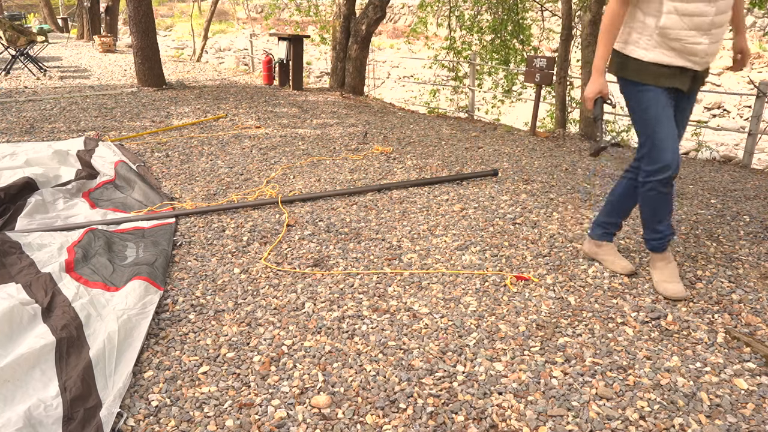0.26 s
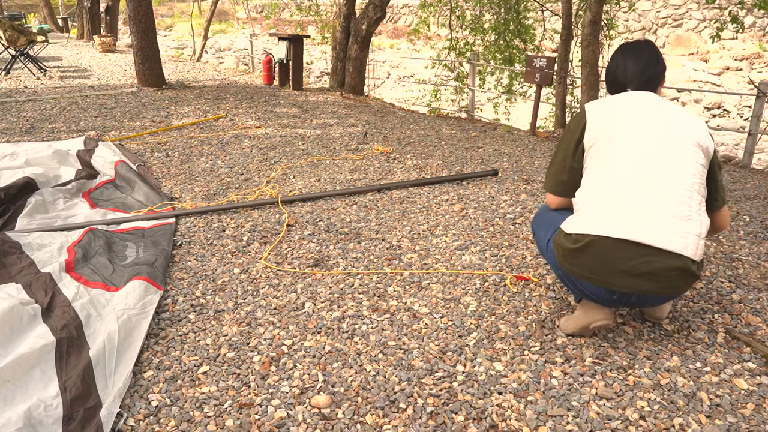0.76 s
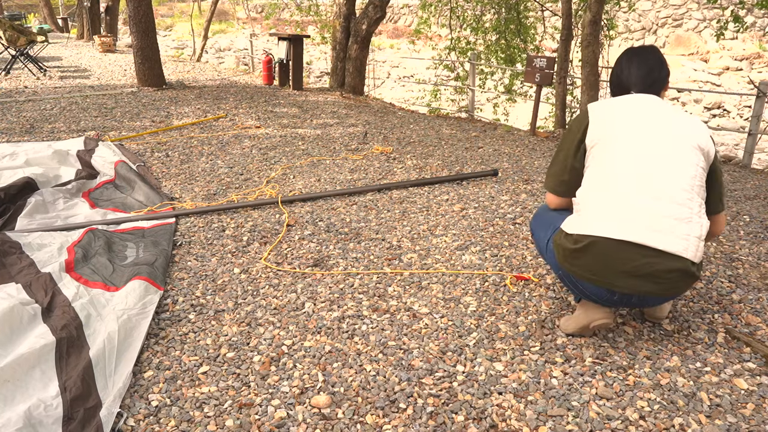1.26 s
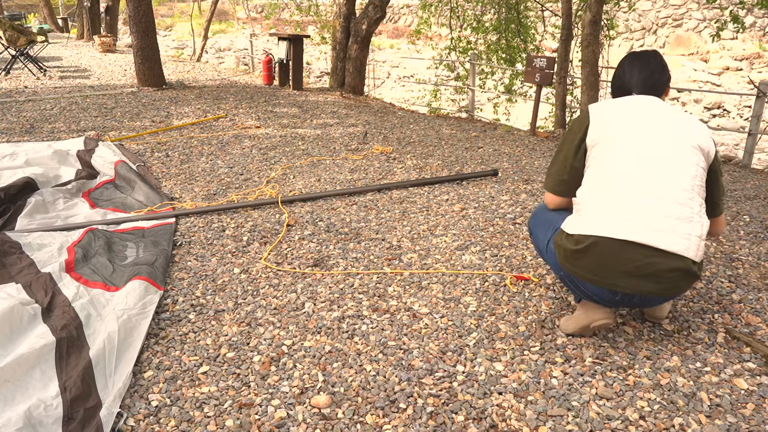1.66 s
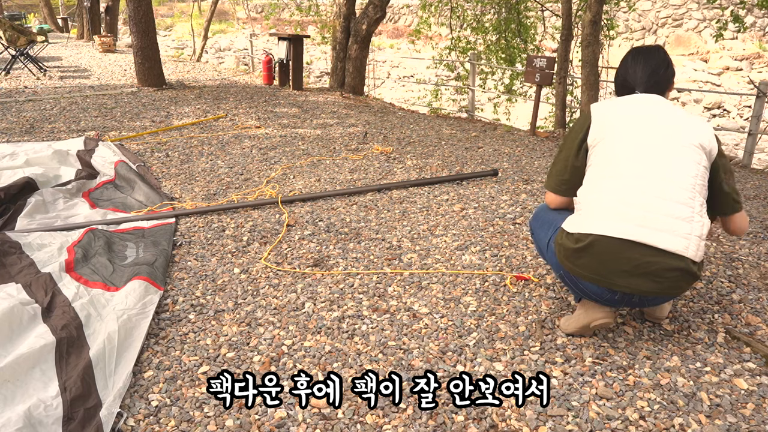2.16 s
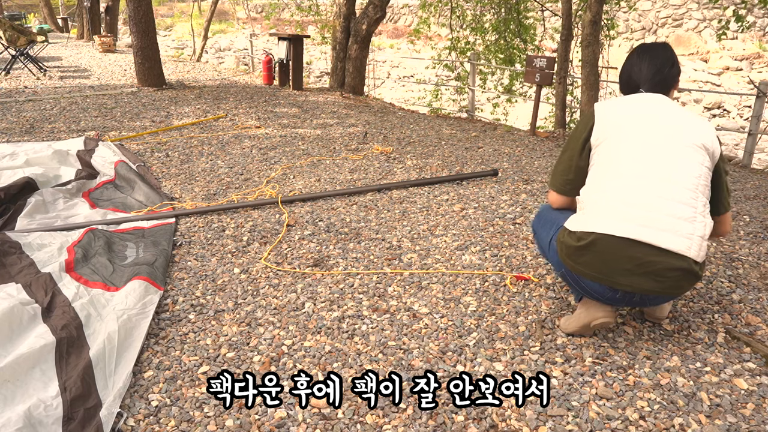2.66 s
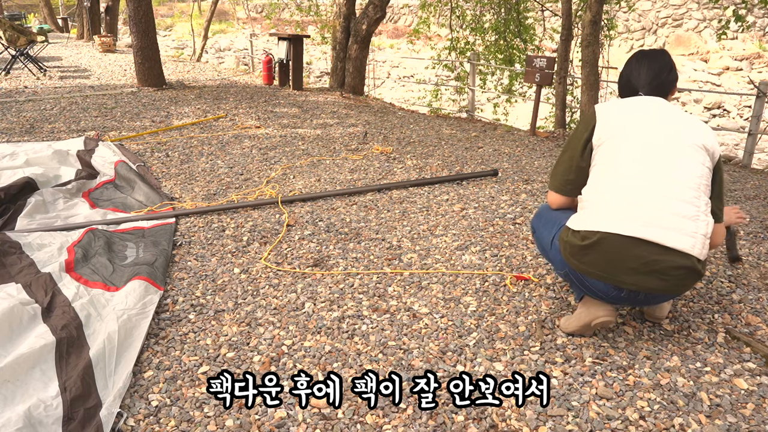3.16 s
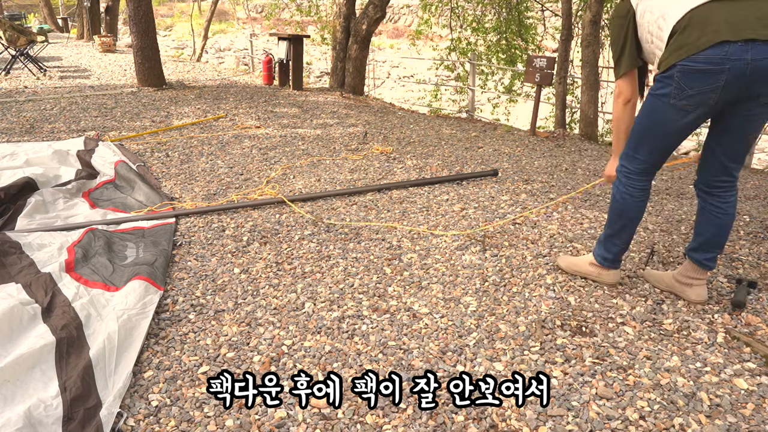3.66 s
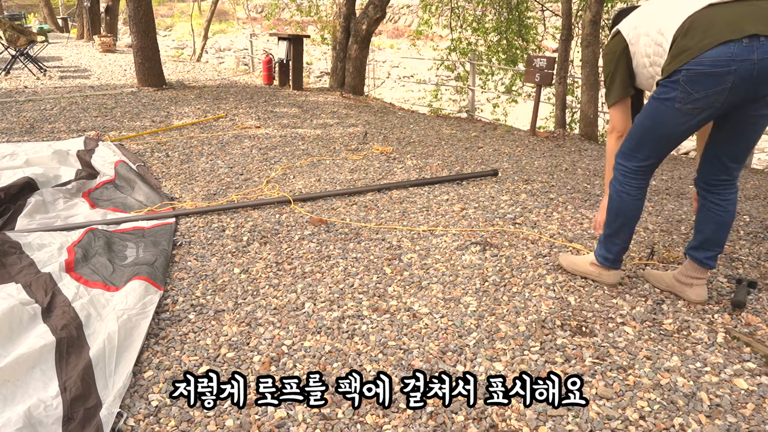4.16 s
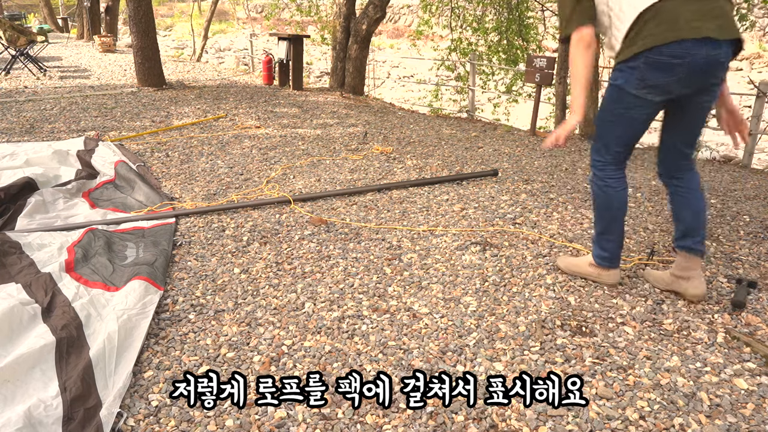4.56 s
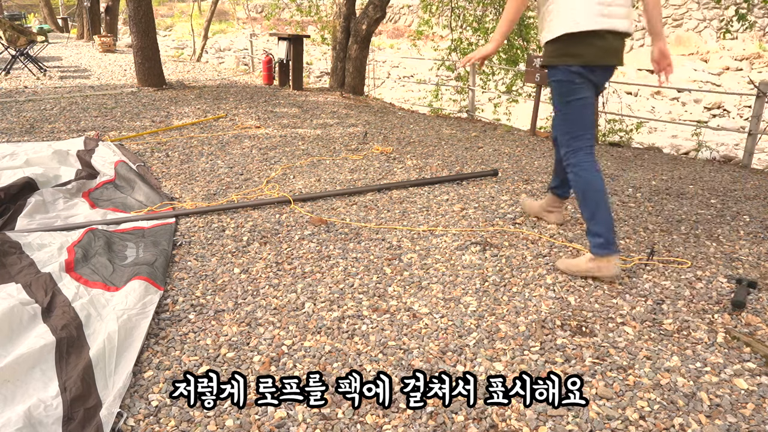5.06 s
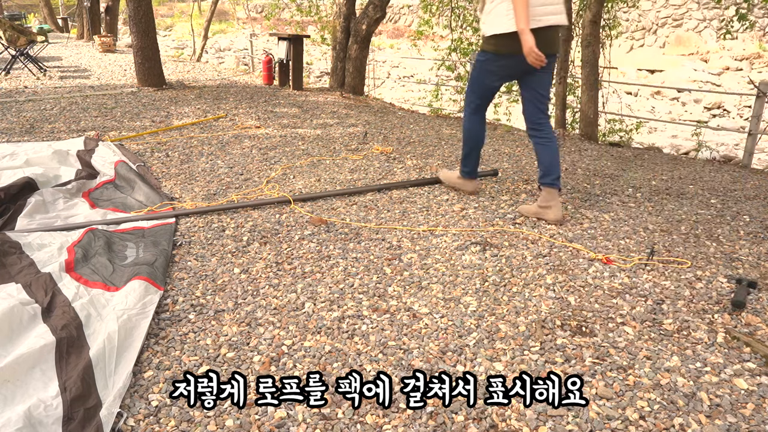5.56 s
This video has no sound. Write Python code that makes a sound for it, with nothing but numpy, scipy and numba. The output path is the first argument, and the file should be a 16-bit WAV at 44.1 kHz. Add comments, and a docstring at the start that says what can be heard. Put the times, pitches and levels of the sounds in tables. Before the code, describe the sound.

Water rushes continuously, leaning to the right. Shoes grind into gravel, then steel cracks on steel four times at roughly even spacing, with wavering high rings and short airy echoes. A tool drops with a stony clatter, pebbles shift, and a tiny high clink is quickly damped. Two crunchy bouts of footsteps finish. Open air, stereo, moderately close, with automatic level control pulling the background down after blows.

```python
"""A campsite on gravel beside a rushing river, which is shaped noise that swells and flickers in bands.
A few steps crunch (grain clouds, single stone knocks and low thuds), then four hammer blows on a steel
tent peg crack as noise and ring as wavering modes, with trees scattering the treble back. The hammer drops
on the stones, a small metal piece clinks in high modes and is stopped by a touch, and steps follow.
A gain control makes the river dip after each loud sound."""
import sys
import numpy as np
from scipy import signal
from scipy.fft import rfft, irfft
from scipy.io import wavfile
from scipy.ndimage import uniform_filter1d
from numba import njit

SR = 44100
rng = np.random.default_rng(int(sys.argv[2]) if len(sys.argv) > 2 else 0)


def materialize(psi):
    """Save the field psi as 16-bit PCM at rate SR to the path in sys.argv[1].

    A 1-D psi becomes a single channel; in a 2-D psi each row is a channel.
    """
    bounded = np.clip(np.atleast_2d(psi).T, -1, 1)
    quanta = np.round(bounded * 32767).astype(np.int16)
    wavfile.write(sys.argv[1], SR, quanta)


def volts_from_decibels(level):
    """Turn decibel levels (scalar or array-like) into linear amplitude factors."""
    exponent = np.asarray(level, float) / 20
    return 10 ** exponent


N = 256040  # samples
T = np.arange(N) / SR  # time [s]
HZ = np.fft.rfftfreq(N, 1 / SR)  # bin frequencies
SIDES = np.array([[1], [-1]])  # left, right

# Hammer blows: (time [s], crack [dB], low ring [dB], high ring [dB], swell that each layer scales [s], # factor
# of the grip on the three low modes' t60 [1], delay until the lifted head turns edge-on [s])
BLOWS = [(.652, -9, -25.5, -14, 0.0262, 0.556, 0.126), (1.283, -11, -25, -18, 0.0222, 1.235, 0.13),
         (1.956, -10.5, -15, -22, 0.012, 0.73, 0.1047), (2.563, -11, -30, -14.5, 0.0207, 0.895, 0.172)]
# Tone colour of each blow, level of each mode group against the modes near 10.7 kHz:
# (6 kHz modes [dB], 8 kHz modes [dB], 11-12 kHz modes [dB], 14 kHz modes [dB])
TONES = [(10.7, -11, 1, 0.5), (19.1, -0.5, 1, 4.5), (3, 5.5, -0.5, -4), (5.6, -1.5, -5, -1)]
# Borders between those groups of modes: (frequency [Hz])
TONE_EDGES_HZ = [7000, 9000, 10900, 13000]
# Steel hammer head, its three low bending modes first: (frequency [Hz], level [dB], t60 before the grip [s])
HEAD_MODES = [(3499, -1, .9), (3466, -2, .3), (3520, -7, .3), (6200, -16, .12), (7730, -6, .2),
              (7989, -5, .2), (8090, -3, .2), (10682, -4, .18), (10748, -4, .24), (10990, -5, .18),
              (11270, -6, .18), (11620, -5, .18), (11688, -4, .18), (11815, -3, .18), (13640, -7, .18),
              (13740, -8, .18)]
# Spectrum of the crack of steel on steel: (frequency [Hz], relative density [dB per Hz])
CRACK_SPECTRUM = [(250, -18), (700, -1), (1500, 4), (3000, -1), (5500, 1), (8500, -1), (12000, 1),
                  (16000, 1)]
# Spectrum of the treble echoes: (frequency [Hz], relative density [dB per Hz])
WASH_SPECTRUM = [(1500, -26), (3000, 9), (5000, 11), (8000, 10.5), (11000, 6), (14000, 11), (16000, 8)]
# Taps of a small metal piece: (time [s], level [dB])
TAPS = [(4.226, -28), (4.234, -27), (4.240, -24), (4.250, -21)]
# Modes of that piece ringing free: (frequency [Hz], level [dB], t60 [s])
PIECE_MODES = [(3300, -8, .03), (4576, -9, .06), (7027, -7, .08), (7752, -9, .1), (11600, -11, .18),
               (12454, 0, .14), (12511, -2, .14), (13055, -4, .24), (13117, -5, .24)]
# Single stones knocking, before panning: (time [s], peak [dB], centre [Hz], bright tick peak [dB])
KNOCKS = [(0.256, -20.5, 802, -35), (0.248, -29.5, 6000, -25.5), (0.271, -16.5, 1500, -36.5),
          (0.3405, -12.5, 2310, -13.5), (0.341, -25, 664, -42), (3.2915, -18, 9000, -15),
          (3.2937, -14.5, 7000, -27.5), (3.299, -25.5, 404, -13), (3.609, -42, 2500, -32.5),
          (3.441, -24, 2330, -40), (3.462, -35, 1600, -17.5), (3.498, -15.5, 2820, -30),
          (3.513, -11, 4600, -23.5), (3.519, -27, 7000, -25.5), (3.522, -14.5, 5970, -23),
          (3.6232, -17, 3040, -39.5), (3.625, -16, 3120, -33), (5.071, -19.5, 8000, -33),
          (5.093, -21, 550, -20), (5.097, -21.5, 8000, -17.5), (5.104, -18.5, 8500, -26),
          (5.108, -19, 748, -35), (5.117, -23, 604, -40), (5.125, -19, 1200, -14),
          (5.149, -26.5, 1215, -29.5), (5.18, -20.5, 1415, -28), (5.627, -22.5, 1300, -13),
          (5.642, -21, 5500, -25.5), (5.649, -24.5, 795, -40), (5.659, -23.5, 3300, -18),
          (5.696, -18, 3000, -27), (5.701, -13.5, 1800, -13.5), (5.723, -22.5, 1800, -40),
          (5.752, -17.5, 2500, -35), (5.765, -20.5, 2800, -35), (5.775, -16, 3260, -5.5),
          (5.779, -20, 1800, -26), (5.788, -15.5, 3300, -30)]
# Gravel giving way under a shoe or the hammer:
# (peak time [s], build-up [s], settling by 60 dB [s], fine grit [dB], deeper stones over grit [dB])
CRUNCHES = [(0.256, 0.056, 0.43, -40, -0.5), (0.341, 0.0206, 0.103, -32.5, -6),
            (0.505, 0.015, 0.118, -44.5, 6), (3.297, 0.0082, 0.116, -21, -21),
            (3.45, 0.07, 0.187, -46.5, 3.5), (3.521, 0.0122, 0.122, -35.5, -30.5),
            (3.58, 0.024, 0.36, -53.5, 10.5), (5.075, 0.025, 0.36, -30.5, -27.5),
            (5.096, 0.0203, 0.182, -26.5, -17.5), (5.129, 0.029, 0.123, -30, -9),
            (5.196, 0.056, 0.118, -33, -12), (5.632, 0.009, 0.2, -29, -16), (5.65, 0.014, 0.6, -35, 4.5),
            (5.698, 0.05, 0.37, -29, 1), (5.752, 0.034, 1, -35, 2), (5.778, 0.025, 0.247, -28.5, 3.5)]
# Spectrum of the fine grit: (frequency [Hz], relative density [dB per Hz])
GRIT_SPECTRUM = [(300, -70), (3000, -12.5), (5000, 3), (9500, -2.5), (11500, -2.5), (14800, -1.5),
                 (16000, -21.5)]
# Spectrum of the rolling pebbles: (frequency [Hz], relative density [dB per Hz])
PEBBLE_SPECTRUM = [(100, -70), (800, -37.5), (1600, -7), (2200, -7), (3300, 2), (5000, -7), (8000, -31)]
# Spectrum of the dull grinding below: (frequency [Hz], relative density [dB per Hz])
GRIND_SPECTRUM = [(40, -65), (300, -6), (550, -0.5), (1200, 2), (2500, -1), (8000, -34.5)]
# Faint ring in the grit: (frequency [Hz], width [Hz], level over the rattle [dB])
GRIT_RING = [(9617, 410, 0.5)]
# Faint ring of the pebbles as they roll: (frequency [Hz], width [Hz], level over the rattle [dB])
PEBBLE_RING = [(1000, 150, -3.5), (1813, 237, 2.5), (3300, 79, -2), (5340, 230, 7.5)]
# Soft bumps carried by the ground: (time [s], peak [dB])
BUMPS = [(0.241, -51), (0.329, -51.5), (1.265, -66), (1.95, -55.5), (2.55, -52.5), (3.285, -53),
         (3.654, -54), (4.215, -66), (5.621, -62)]
# Where the camper is: (time [s], left minus right [dB])
PLACE = [(0, -1.5), (.5, -4.5), (3.3, -7), (3.5, -12.5), (5.05, -4.5), (5.62, -3.5), (5.75, 0.5)]
# Spectrum of the river: (frequency [Hz], relative density [dB per Hz])
RIVER_SPECTRUM = [(18, -77), (30, -45), (90, -30), (273, -9.5), (319, -7.5), (355, -5.5), (512, -4.5),
                  (600, -4.5), (780, -2.5), (1160, 0), (2750, -1.5), (3140, -4), (6050, -8), (9460, -13.5),
                  (16000, -18.5)]
# Balance of the river: (frequency [Hz], left minus right [dB])
RIVER_PAN = [(60, -10.5), (110, 2), (200, 0), (380, -1), (700, -3.5), (1290, -8), (2380, -7.5),
             (4400, -5.5), (8120, -1.5), (15000, -2)]
# Likeness of the river left and right: (frequency [Hz], correlation [1])
RIVER_ALIKE = [(60, 0.35), (200, 0.878), (640, 0.8), (1410, 0.36), (2200, 0.547), (3100, 0.023),
               (5500, 0.05), (6500, 0.875), (15000, 0.913)]

LOW_ROUGH, HIGH_ROUGH = .4, 1  # share of wavering in the head's low and high modes
WASH_DB, WASH_FOLLOWS = 4.5, 0.71  # echo wash offset, and dB gained per dB of high ring
PIECE_HELD_S = 4.302  # a touch stops the metal piece
BUILD_DB = 16.5  # rise of a crunch over its build-up
GRIND_DB, GRIND_FOLLOWS = -2, 0.332  # grind over grit, and dB gained per dB of deeper stones
THUD_DB = -5  # thud peak over grind
RIVER_DB = -35  # rms of the left-right mean
LEFT_LAG, IN_STEP_HZ = 3, 6300  # samples the left is late; from this frequency up, no lag
TOP_HZ = 15900  # upper cut of the mix


def across(table):
    """Reads a (frequency, value) table at every bin, along log frequency."""
    hz, value = np.transpose(table)
    return np.interp(np.log(HZ + 1), np.log(hz), value)


def colour(x, spectrum):
    """Filters by a spectrum in dB, scaled so that white noise keeps its power."""
    gain = volts_from_decibels(across(spectrum))
    return irfft(rfft(x) * gain / np.sqrt(np.mean(gain ** 2)), N)


def walk(rate_hz):
    """Slow random drift of spread near 1: levels held for one period, then smoothed twice."""
    hold = int(SR / rate_hz)
    steps = np.repeat(rng.standard_normal(N // hold + 1), hold)
    return 1.3 * uniform_filter1d(uniform_filter1d(steps, hold), hold)[:N]


def after(s, rise_s, t60_s):
    """First sample, age and rise-and-die envelope of a sound starting at s."""
    start = int(s * SR)
    length = int((t60_s + 5 * rise_s + .02) * SR)
    age = T[:min(length, N - start)] + start / SR - s + 1 / SR
    return start, age, (1 - np.exp(-age / rise_s)) ** 2 * volts_from_decibels(-60 * age / t60_s)


def add(out, start, x):
    """Mixes x into out from sample start on."""
    out[:, start:start + x.shape[-1]] += x


def burst(env, lo_hz, hi_hz):
    """A hard first contact and a puff of noise, rung through one band; peak 1."""
    push = env * rng.standard_normal(len(env))
    push[np.argmax(env)] += 2.5
    band = signal.butter(2, [lo_hz, hi_hz], "bandpass", fs=SR, output="sos")
    x = signal.sosfilt(band, push)
    return x / np.abs(x).max()


def ring(out, s, modes, db, rise_s, pan_db, rough, fastest_hz=440):
    """Decaying modes; motion and scattered echoes make each waver in level and phase, partly alike in stereo."""
    x = np.zeros_like(out)
    for (hz, mode_db, t60), blow_db in zip(modes, db):
        start, age, env = after(s, rise_s, t60)
        knots = rng.standard_normal((2, 3, 200))
        knots = knots[0] + 1j * knots[1]
        # high modes waver faster
        place = age * np.clip(48 * (hz / 3500) ** 1.9, 1, fastest_hz)
        # row 0 is shared, rows 1 and 2 belong to left and right
        drift = np.array([np.interp(place, np.arange(200), row) for row in .6 * knots[0] + .6 * knots[1:]])
        steady = np.exp(1j * np.angle(knots[0, 0]))
        wave = ((1 - rough) * steady + rough * drift) * np.exp(2j * np.pi * hz * age)
        # wavering keeps the energy
        energy = np.sum(np.abs(env * wave) ** 2, axis=1, keepdims=True)
        wave /= np.sqrt(energy / np.sum(env ** 2))
        add(x, start, volts_from_decibels(mode_db + blow_db + pan_db / 2 * SIDES) * env * wave.imag)
    return out + x


def hammer():
    """A sharp crack, a head that sings out once it springs off the peg, and treble scattered back by the trees."""
    out, crack, wash = np.zeros((3, 2, N))
    head_hz = np.transpose(HEAD_MODES)[0]
    for (s, crack_db, low_db, high_db, swell_s, grip, turn_s), tone in zip(BLOWS, TONES):
        # the peg buzzes on after the snap
        start, age, env = after(s, 0.00015, 0.061)
        push = env * (.3 + .8 * volts_from_decibels(-60 * age / .008)) * rng.standard_normal(len(age))
        push[np.argmax(env) // 2] += 1.5  # steel meets steel
        add(crack, start, volts_from_decibels(crack_db + SIDES * -3.0) * push)

        # echoes from the trees, mostly different left and right
        start, age, env = after(s + .004, 1.19 * swell_s, 0.18)
        noise = rng.standard_normal((3, len(age)))
        echoes = 0.153 * noise[0] + 1.086 * noise[1:]
        add(wash, start, volts_from_decibels(WASH_DB + WASH_FOLLOWS * high_db + SIDES * -.4) * env * echoes)

        # the 10.7 kHz group is the reference, 0 dB
        tone_db = np.insert(tone, 2, 0)[np.digitize(head_hz, TONE_EDGES_HZ)]
        high_modes_db = high_db + tone_db + 3 * rng.standard_normal(len(HEAD_MODES))
        db = np.where(head_hz < 4000, low_db, high_modes_db)

        low_modes = np.array(HEAD_MODES[:3]) * [1, 1, grip]
        low = ring(0 * out, s, low_modes, db[:3], 0.7 * swell_s, pan_db=-3, rough=LOW_ROUGH)
        # the low ring dips as the head turns edge-on
        out = out + low * (1 - .7 * np.exp(-((T - s - turn_s) / .03) ** 2))

        # many small modes at random pitches, then the listed high ones
        small = np.column_stack([rng.uniform(6500, 15600, 14), -12 + 3 * rng.standard_normal(14),
                                 np.full(14, .16)])
        out = ring(out, s + .002, small, np.full(len(small), high_db), 1.23 * swell_s,
                   pan_db=-6.5, rough=HIGH_ROUGH)
        out = ring(out, s + .002, HEAD_MODES[3:], db[3:], 0.804 * swell_s, pan_db=3.0, rough=HIGH_ROUGH)
    return out + colour(crack, CRACK_SPECTRUM) + colour(wash, WASH_SPECTRUM)


def clink():
    """The small metal piece bounces, rings high over its own echoes and is stopped short."""
    out, wash = np.zeros((2, 2, N))
    for s, db in TAPS:
        out = ring(out, s, PIECE_MODES, np.full(len(PIECE_MODES), db), 0.0005,
                   pan_db=-6, rough=0.65, fastest_hz=200)
        start, age, env = after(s, 0.00084, 0.23)
        add(wash, start, volts_from_decibels(db - 6 + SIDES * -1.5) * env * rng.standard_normal((2, len(age))))
    held = volts_from_decibels(-700 * np.maximum(T - PIECE_HELD_S, 0))  # falls 700 dB per s
    return (out + colour(wash, WASH_SPECTRUM)) * held


def camper_pan(s):
    """Left and right gains for a sound made where the camper is."""
    return volts_from_decibels(np.interp(s, *np.transpose(PLACE)) / 2 * SIDES)


def knocks():
    """Each stone knocks as a few cycles around its own pitch and a bright tick."""
    out = np.zeros((2, N))
    for s, db, hz, tick_db in KNOCKS:
        start, _, env = after(s, 0.00044, 0.005 + 7 / hz)
        add(out, start, camper_pan(s) * volts_from_decibels(db) * burst(env, hz * 0.604, hz * 1.091))
        tick_env = after(s, 0.00016, 0.0055)[2]
        add(out, start, camper_pan(s) * volts_from_decibels(tick_db) * burst(tick_env, 7700, 14500))
    return out


def grains(per_s, spread_db):
    """Random clicks, many small and a few large; rms 1."""
    hits = rng.random(N) < per_s / SR
    x = hits * rng.standard_normal(N) * volts_from_decibels(spread_db * rng.exponential(size=N))
    return x / x.std()


def rung(x, rings):
    """Adds the stones' resonances to their rattle."""
    gain = 1 + sum(volts_from_decibels(db) / (1 + 2j * (HZ - hz) / width) for hz, width, db in rings)
    return irfft(rfft(x) * gain, N)


def gravel_bed(per_s, spectrum, clumps_db):
    """Three coloured grain layers (shared, left, right) whose level moves as stones slip in clumps."""
    level = volts_from_decibels(clumps_db + 1.5 * walk(130))
    return level * colour(np.array([grains(per_s, spread_db=2.2) for _ in range(3)]), spectrum)


def gravel():
    """Dense fine grit on top, pebbles under it, duller grinding below; the ground thuds."""
    clumps_db = 1.8 * walk(220)
    grit = rung(gravel_bed(6000, GRIT_SPECTRUM, clumps_db), GRIT_RING)
    pebbles = rung(gravel_bed(1800, PEBBLE_SPECTRUM, clumps_db), PEBBLE_RING)
    grind = gravel_bed(1000, GRIND_SPECTRUM, clumps_db)
    power, thuds = np.zeros((3, N)), np.zeros((2, N))
    for s, build_s, settle_s, grit_db, deep_db in CRUNCHES:
        grind_db = GRIND_DB + GRIND_FOLLOWS * deep_db
        shape_db = np.minimum(BUILD_DB * (T - s) / build_s, -60 * (T - s) / settle_s)
        layers_db = np.array([[0], [deep_db], [grind_db]])
        power += volts_from_decibels(grit_db + shape_db) ** 2 * volts_from_decibels(layers_db) ** 2
        start, _, env = after(s, 0.00172, 0.0593)
        add(thuds, start, volts_from_decibels(grit_db + grind_db + THUD_DB) * burst(env, 204, 585))
    for s, db in BUMPS:
        start, _, env = after(s, 0.0039, 0.055)
        add(thuds, start, volts_from_decibels(db) * np.array([burst(env, 24, 95) for _ in SIDES]))
    x = sum(np.sqrt(p) * bed for p, bed in zip(power, (grit, pebbles, grind)))
    return camper_pan(T) * (x[0] + .7 * x[1:]) + thuds


def river():
    """Rushing water off to the right: half-octave noise bands that swell together and flicker alone."""
    alike = np.clip(across(RIVER_ALIKE), -.99, .99)
    mid, side = (rfft(rng.standard_normal(N)) for _ in range(2))
    pair = np.sqrt(1 + alike) * mid + SIDES * np.sqrt(1 - alike) * side
    pair = pair * volts_from_decibels(across(RIVER_SPECTRUM) + SIDES * across(RIVER_PAN) / 2)
    out, swell = 0, walk(0.23)
    for k in range(20):
        band = np.clip(1 - np.abs(2 * np.log2((HZ + 1) / 25) - k), 0, 1)
        out = out + irfft(pair * band, N) * volts_from_decibels(1.2 * swell + 1.05 * walk(9))
    return out * volts_from_decibels(RIVER_DB) / out.mean(axis=0).std()


def scene():
    """The left is delayed by LEFT_LAG samples below IN_STEP_HZ; the treble stays in step."""
    left, right = hammer() + clink() + knocks() + gravel() + river()
    lag = np.exp(-2j * np.pi * HZ * LEFT_LAG / SR * (HZ < IN_STEP_HZ))
    return np.array([irfft(rfft(left) * lag, N), right])


@njit
def follow(x, attack, release):
    """Envelope that rises fast and falls slowly; attack and release are shares per sample."""
    y, e = np.empty(len(x)), 0.
    for i in range(len(x)):
        e += (x[i] - e) * (attack if x[i] > e else release)
        y[i] = e
    return y


def top_cut(x):
    """Nothing passes above the cut-off."""
    return signal.sosfilt(signal.butter(12, 16960, fs=SR, output="sos"), x)


def record(dry):
    """Gain control turns both channels down together above a knee; then top and bottom are cut."""
    attack_s, release_s, knee_db = .002, .04, -18.5
    level = follow(np.abs(dry).max(axis=0), 1 / (attack_s * SR), 1 / (release_s * SR))
    # the power over 1 turns down slightly more than the excess
    gain = np.minimum(volts_from_decibels(knee_db) / (level + 1e-9), 1) ** 1.07
    mix = signal.sosfilt(signal.ellip(8, .2, 60, TOP_HZ, fs=SR, output="sos"), dry * gain)
    mix = signal.sosfilt(signal.butter(1, 90, "highpass", fs=SR, output="sos"), mix)
    return top_cut(mix)


dry = scene()
out = record(dry)
materialize(out)
```